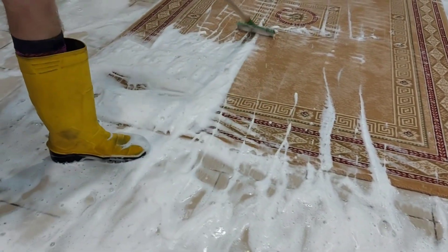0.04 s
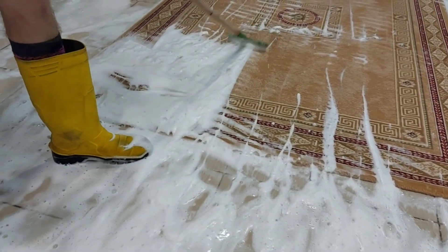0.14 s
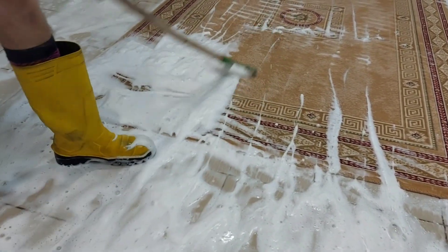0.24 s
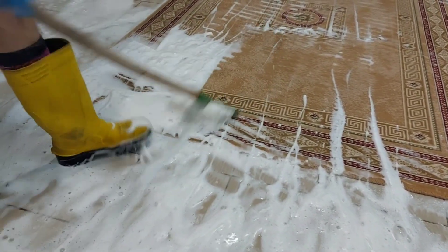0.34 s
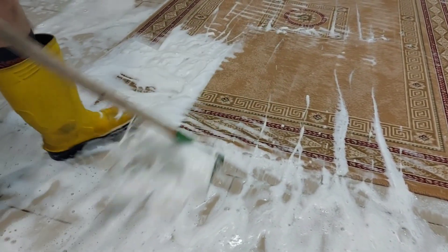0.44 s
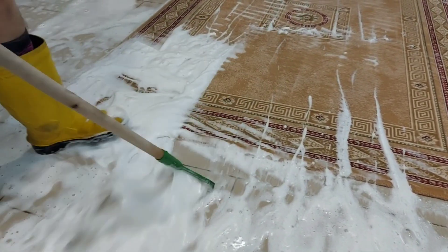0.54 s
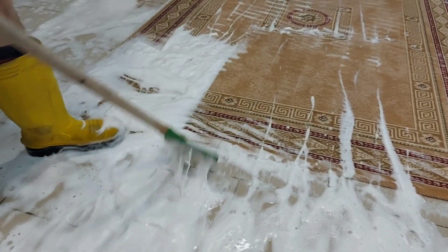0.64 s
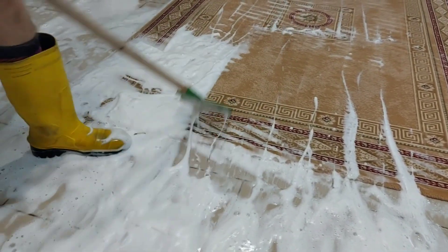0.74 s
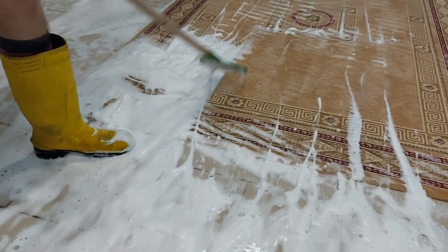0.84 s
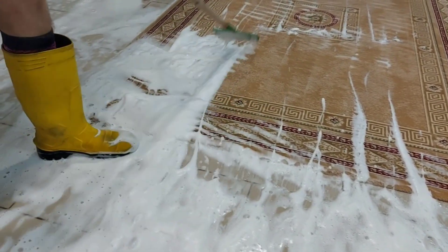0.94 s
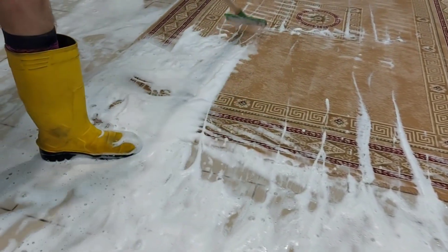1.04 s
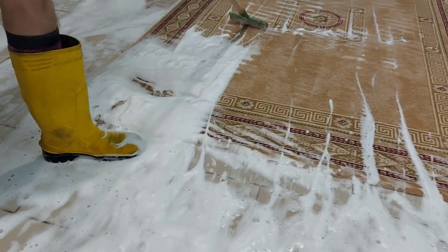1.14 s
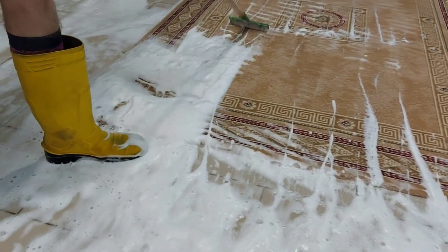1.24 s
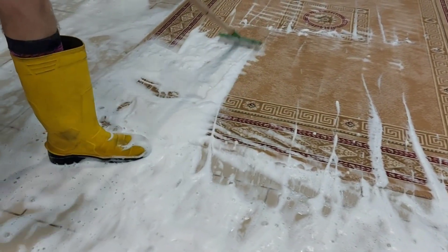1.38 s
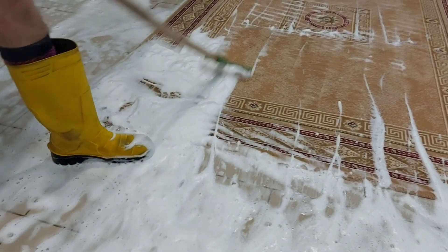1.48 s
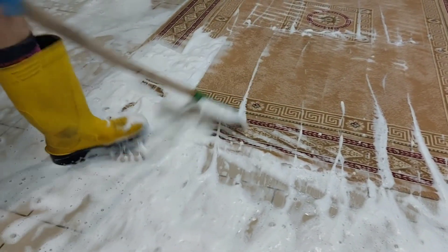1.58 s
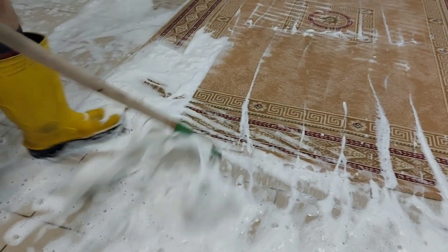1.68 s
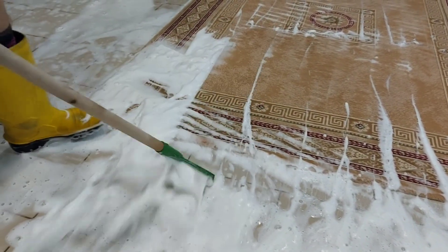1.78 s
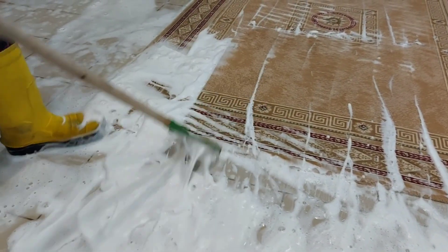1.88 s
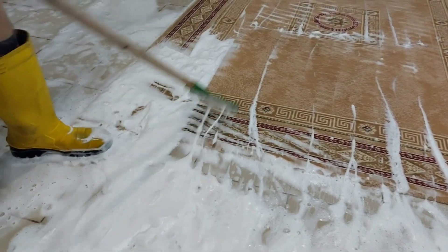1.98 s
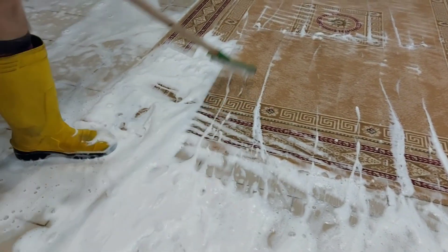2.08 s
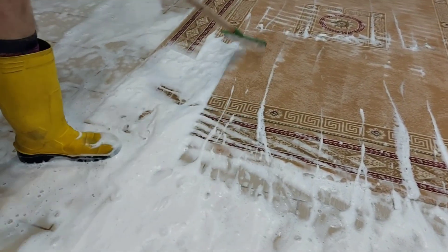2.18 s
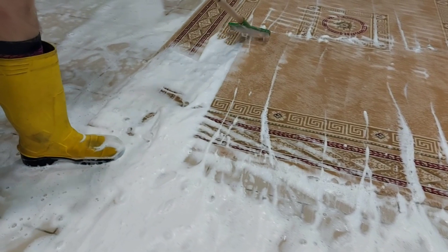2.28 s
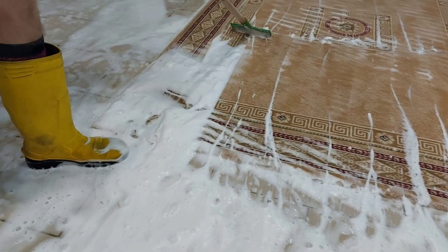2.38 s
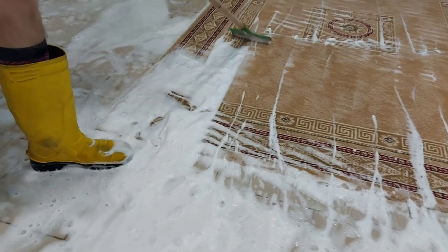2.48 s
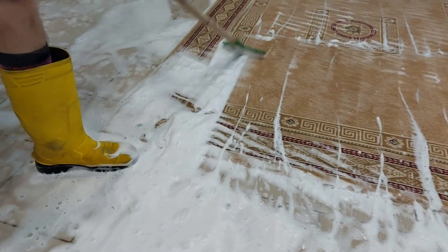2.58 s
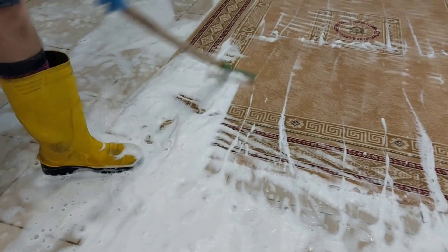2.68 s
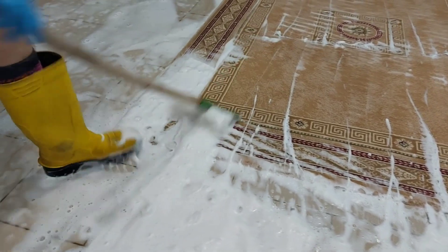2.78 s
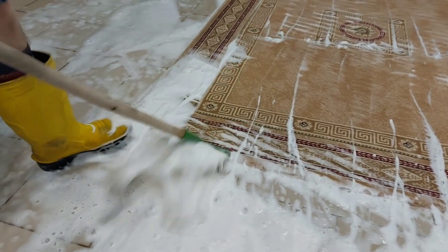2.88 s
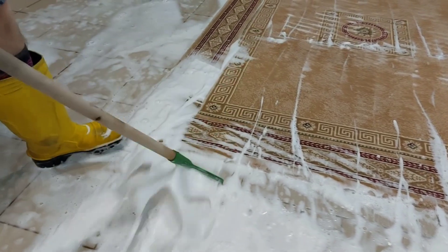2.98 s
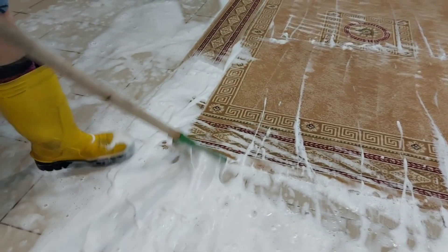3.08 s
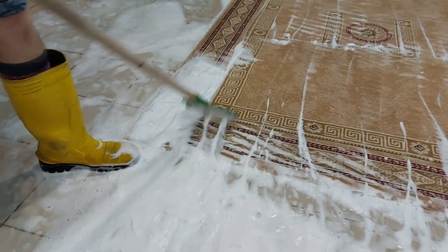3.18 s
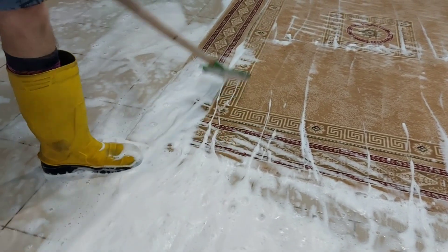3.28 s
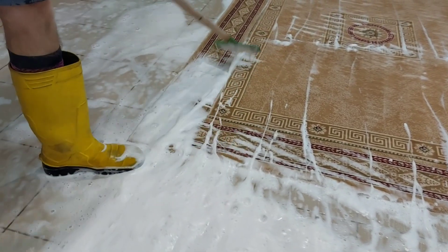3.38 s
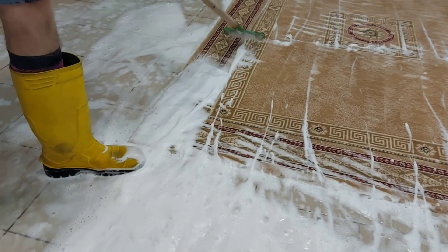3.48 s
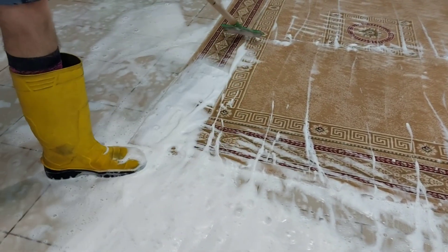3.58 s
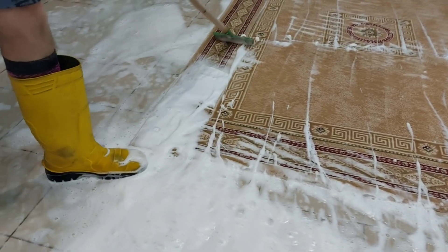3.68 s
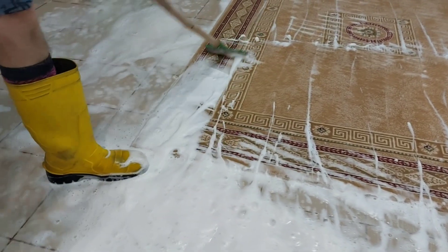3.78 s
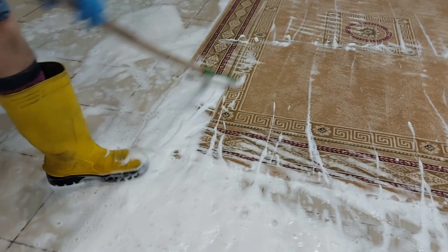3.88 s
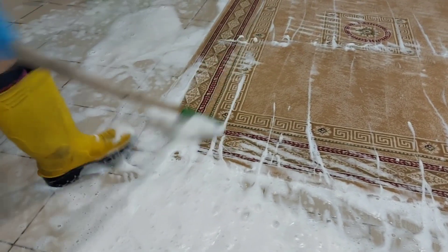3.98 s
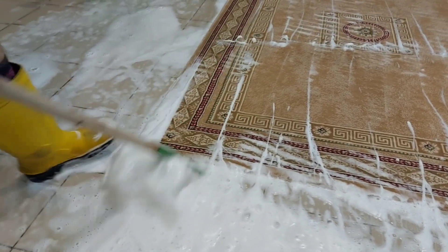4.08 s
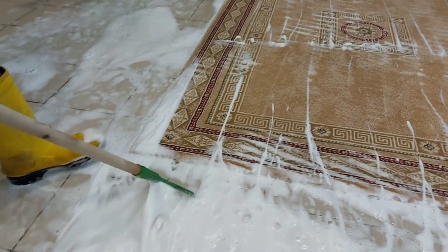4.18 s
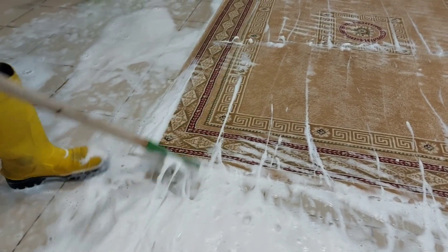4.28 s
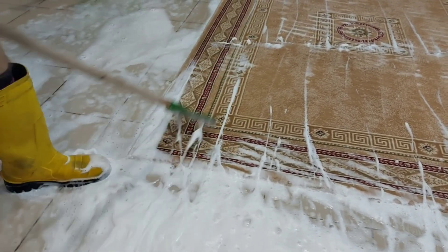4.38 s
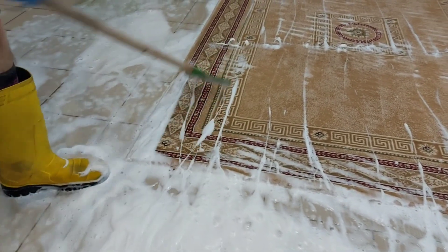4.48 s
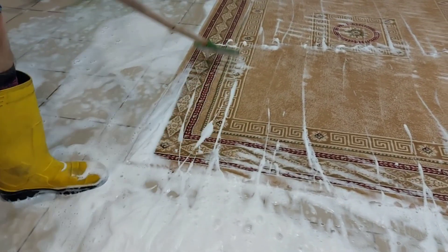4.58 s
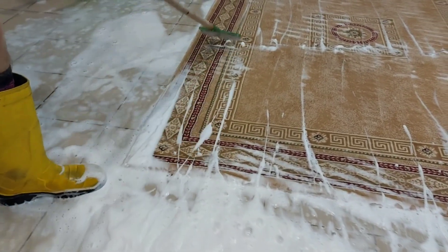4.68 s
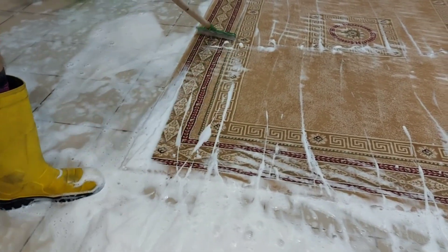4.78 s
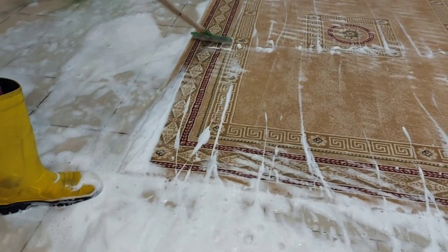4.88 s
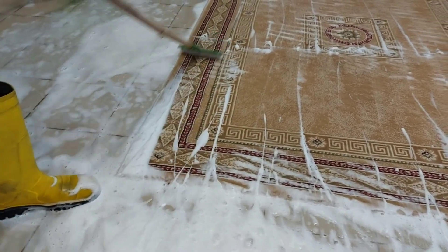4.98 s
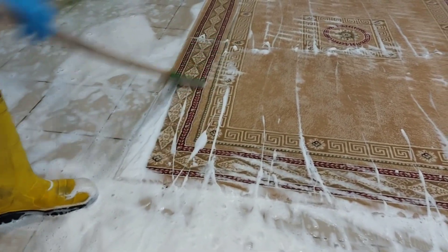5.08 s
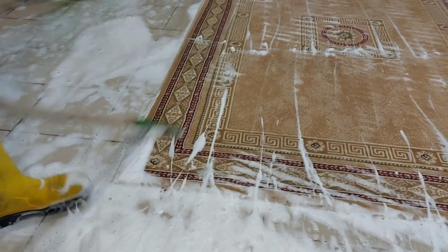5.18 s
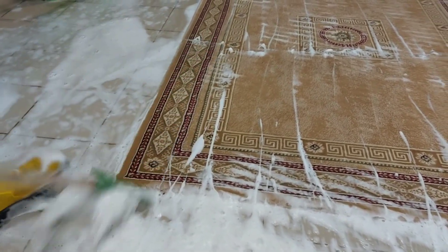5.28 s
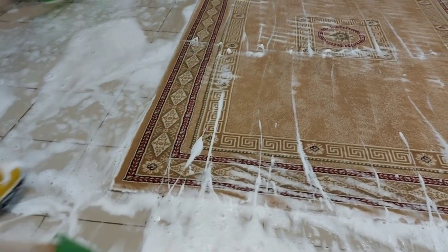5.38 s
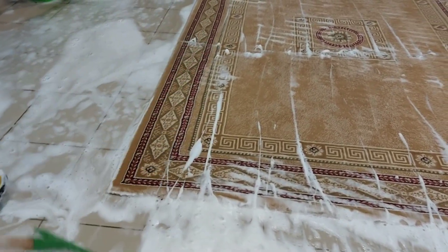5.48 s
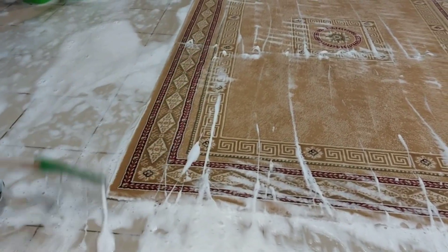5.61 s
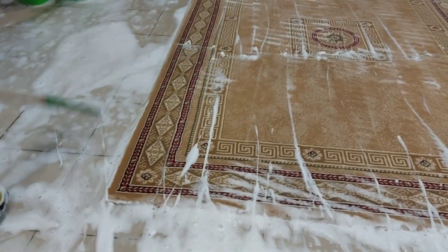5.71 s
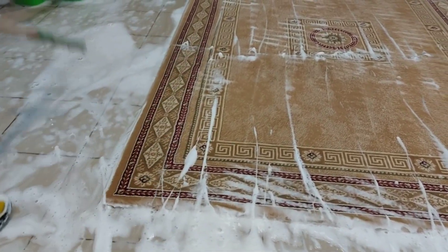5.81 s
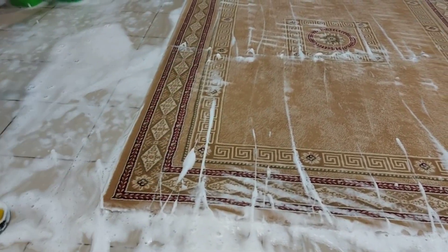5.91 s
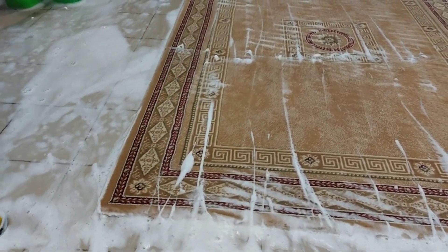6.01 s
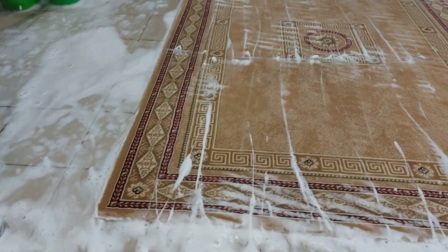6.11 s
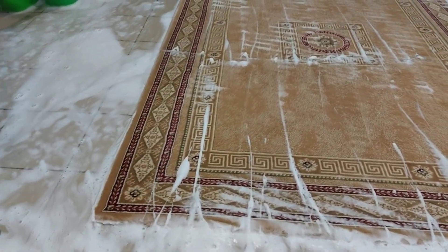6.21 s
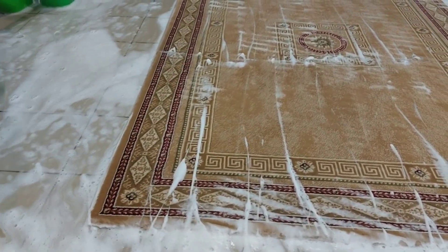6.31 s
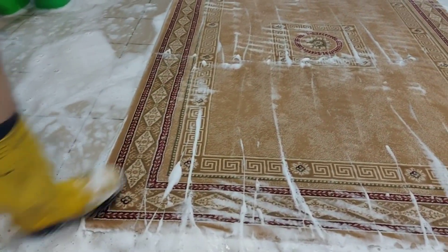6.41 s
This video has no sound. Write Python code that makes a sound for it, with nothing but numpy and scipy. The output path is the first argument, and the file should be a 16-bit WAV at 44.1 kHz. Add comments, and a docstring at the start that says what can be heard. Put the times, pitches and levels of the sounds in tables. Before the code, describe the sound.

In an echoing tiled room, rhythmic wet scrubbing swells and slaps off a carpet's edge, splashing gurgling suds over a low motor drone.

```python
"""A tiled, echoing workshop: a long-handled brush is dragged five times over a soapy wet carpet.
Each stroke swells into a wet hiss of crackling noise, with clouds of short rising bubble tones around it.
Then the head drops off the carpet's edge and slaps the flooded tiles: noise cracks, ringing plastic,
trapped air that plops, short pitched spits of noise, and thrown suds that patter and gurgle.
A machine hums in bands of noise, the foam fizzes in tiny bursts and drops tick on the floor."""
import sys
import numpy as np
from scipy import signal
from scipy.fft import rfft, irfft, next_fast_len
from scipy.io import wavfile
from scipy.ndimage import uniform_filter1d, map_coordinates

SR = 44100
rng = np.random.default_rng(int(sys.argv[2]) if len(sys.argv) > 2 else 0)


def waveform_to_disk(signal):
    """Save audio, clipped to [-1, 1], as 16-bit WAV at the path in sys.argv[1]."""
    frames = np.transpose(np.atleast_2d(signal))
    scaled = np.clip(frames, -1, 1) * 32767
    samples = np.round(scaled).astype(np.int16)
    wavfile.write(sys.argv[1], SR, samples)


N = 284445
TOP_HZ = 15950  # upper band limit


def amp(db):
    """Decibels to gain."""
    return 10 ** (np.asarray(db) / 20)


def unit(x):
    """Scaled to rms 1."""
    return x / np.sqrt(np.mean(x ** 2) + 1e-20)


def along(points, hz):
    """(frequency [Hz], value) points read on a log frequency axis."""
    f, v = np.transpose(points)
    return np.interp(np.log(hz + 1), np.log(f), v)


def clock():
    """The time of every sample in seconds."""
    return np.arange(N) / SR


def swell(s, width):
    """A bell-shaped rise and fall around time s; width is its standard deviation in seconds."""
    return np.exp(-.5 * ((clock() - s) / width) ** 2)


def wobble(rate):
    """A smooth random curve, rate knots a second."""
    knots = rng.standard_normal(int(N * rate / SR) + 4)
    return map_coordinates(knots, [clock() * rate])


def filtered(x, response):
    """x times a response of frequency, padded so that the end does not wrap onto the start."""
    m = next_fast_len(x.shape[-1] + 8192)
    spectrum = rfft(x, m) * response(np.fft.rfftfreq(m, 1 / SR))
    return irfft(spectrum, m)[..., :x.shape[-1]]


def coloured(x, spectrum, size=2048):
    """x through a causal (minimum-phase) filter of unit energy with this spectrum."""
    gain = amp(along(spectrum, np.fft.rfftfreq(size, 1 / SR)))
    cepstrum = irfft(np.log(gain))
    cepstrum[1:size // 2] *= 2
    cepstrum[size // 2 + 1:] = 0
    kernel = irfft(np.exp(rfft(cepstrum)))
    return signal.fftconvolve(x, kernel / np.linalg.norm(kernel))[:len(x)]


def cut(x, hz, kind):
    """A gentle causal low-pass or high-pass."""
    b, a = signal.butter(2, min(hz, .45 * SR), kind, fs=SR)
    return signal.lfilter(b, a, x)


def add(track, s, sound):
    """Mix a sound into a track at time s."""
    part = track[max(round(s * SR), 0):][:len(sound)]
    part += sound[:len(part)]


def crackle(rate, spread_db):
    """Tiny bursts of uneven size at random times, rate a second on average, rms 1."""
    bursts = rng.random(N) < rate / SR
    heights = rng.standard_normal(N)
    return unit(bursts * heights * amp(spread_db * np.clip(rng.standard_normal(N), -2, 2)))


def pocket(t, hz, t60, attack, rise):
    """Air trapped in water rings, its pitch rising as it nears the surface; it radiates no deep bass."""
    t = np.maximum(t, 0)
    phase = 2 * np.pi * hz * t * (1 + rise * np.minimum(t / t60, 1))
    envelope = amp(-60 * t / t60) * (1 - np.exp(-t / attack))
    return cut(np.sin(phase) * envelope, 0.44 * hz, "high")


def bubbling(rate, centre_hz, spread, cycles, size):
    """A cloud of short rising bubble tones of uneven strength around a steady or moving pitch, rms 1."""
    draws = rng.standard_normal((round(rate * N / SR), 2))
    pitch_draw, level_draw = np.clip(draws[:, :1], -2, 2), np.clip(draws[:, 1:], -2, 2)
    starts = rng.integers(0, N, (len(draws), 1))
    hz = np.broadcast_to(centre_hz, N)[starts] * np.exp(spread * pitch_draw)
    age = hz * np.arange(size) / SR  # in cycles
    envelope = amp(1.4 * level_draw - 60 * age / cycles) * (1 - np.exp(-2 * age))
    tones = envelope * np.sin(2 * np.pi * age * (1 + 0.2 * age / cycles))
    places = starts + np.arange(size)
    return unit(np.bincount(places.ravel(), tones.ravel(), N)[:N])


def snap(t60, rise, lead_in, size=60):
    """A short burst of noise with an evened-out spectrum; it starts after a quiet lead-in."""
    t = np.maximum(np.arange(SR // 5) / SR - lead_in, 0)
    shape = amp(-60 * t / t60) * (1 - np.exp(-t / rise))
    z = rfft(shape * rng.standard_normal(len(t)))
    smooth_power = np.abs(uniform_filter1d(np.abs(z) ** 2, size))
    return np.linalg.norm(shape) * irfft(z / np.sqrt(smooth_power), len(t))


def snaps(rows, colour, t60, rise, echo_db):
    """Rows of (s, dB, top Hz) as sharp snaps, scattered off the wet floor and into the room."""
    pair, echo_feed = np.zeros((2, N)), np.zeros(N)
    lead_in = .004  # s
    for s, db, top_hz in rows:
        for track in pair:
            burst = amp(db) * snap(t60, rise, lead_in)
            add(track, s - lead_in, cut(burst, top_hz, "low"))
        # the echo is fed a single impulse of the same energy, so its colour stays even
        impulse = np.linalg.norm(burst) * signal.unit_impulse(len(burst))
        add(echo_feed, s, cut(impulse, top_hz, "low"))
    straight = diffuse(np.array([coloured(track, colour) for track in pair]))
    return straight + amp(echo_db) * echo(coloured(echo_feed, colour))


# Likeness of left and right in sound from all sides: (frequency [Hz], correlation)
ALIKE = [(100, 0.99), (250, 0.95), (500, 0.68), (900, -0.04), (1500, -0.021), (4000, -0.0087)]


def diffuse(pair):
    """Two unrelated signals as sound from all sides: alike in the bass only."""
    turn = lambda hz: np.arccos(np.clip(along(ALIKE, hz), -1, 1)) / 2
    mid, side = filtered(pair, lambda hz: np.array([np.cos(turn(hz)), np.sin(turn(hz))]))
    return np.array([mid + side, mid - side])


def direct(x, left_lead=.0001):
    """Work a little to the left: its straight path reaches the left channel first, by left_lead seconds."""
    sides = np.array([[1], [-1]])
    return filtered(x, lambda hz: np.exp(1j * np.pi * hz * left_lead * sides))


# Decay of the hard-walled room: (frequency [Hz], time to fall 60 dB [s])
ROOM_T60 = [(100, 0.81), (500, 1.39), (1200, 1.14), (3500, 0.87), (7000, 0.66), (14000, 0.63)]


def echo(x, build_up=0.00061):
    """The tiled room answers from all sides with decaying noise, the treble dying first."""
    hz, t, z = signal.stft(rng.standard_normal((2, SR)), SR, nperseg=256)
    z = z * (1 - np.exp(-t / build_up)) * amp(-60 * t / along(ROOM_T60, hz)[:, None])
    tail = diffuse(signal.istft(z, SR, nperseg=256)[1])
    tail = tail / np.sqrt(np.sum(tail ** 2) / 2)
    return signal.fftconvolve(x[None], tail, axes=1)[:, :N]


def in_room(x, direct_db, echo_db):
    """A source heard both straight and off the walls."""
    return amp(direct_db) * direct(x) + amp(echo_db) * echo(x)


def scattered(make, direct_db, echo_db):
    """A wide spray of many small sources: left and right hear their own treble detail."""
    pair = np.array([make(), make()])
    return amp(direct_db) * diffuse(pair) + amp(echo_db) * echo(pair[0])


# Fuzzy bands of the drone: (centre [Hz], width [Hz], level before the slow level curve [dB])
HUM = [(73.5, 3.8, -56), (225.5, 22, -42), (250.9, 11.1, -40), (279, 23, -43), (341, 27, -50.5),
       (382.6, 32, -49), (485, 20, -47.5)]
# Slow level curve of the machine: (time [s], drone gain [dB], air gain [dB])
HUM_LEVEL = [(0, -2.5, -1.5), (1.35, -3.5, -1.5), (2.0, 1, 1.5), (3.6, 0.2, 0.4), (5.2, 0, 1.2),
             (6.4, -0.5, 0)]
# Colour of the machine's air: (frequency [Hz], relative level [dB])
AIR = [(20, -17), (36, -8), (90, 0), (180, 0), (350, -0.5), (600, -3), (1000, -8.5), (1800, -18),
       (2800, -20), (4000, -28.5), (7000, -40), (16000, -43)]


def machine(air_db=-42.0, waver_db=1.14, waver_share=0.01092):
    """A motor drones in fuzzy bands, each swelling on its own, all wavering in pitch, over the rush of its air."""
    times, *levels = np.transpose(HUM_LEVEL)
    drone_gain, air_gain = [amp(np.interp(clock(), times, db)) for db in levels]
    air_noise = rng.standard_normal((2, N))
    air = amp(air_db) * unit(filtered(air_noise, lambda f: amp(along(AIR, f))))
    drone = np.zeros((2, N))
    for hz, width, db in HUM:
        noise = rng.standard_normal((2, N))
        band = filtered(noise, lambda f: (1 + (2 * (f - hz) / width) ** 4) ** -.5)
        drone += amp(db) * unit(band * amp(waver_db * wobble(4)))
    # reading the drone at an uneven speed bends its pitch
    turned = np.cumsum(1 + waver_share * wobble(3))
    drone = np.array([map_coordinates(side, [turned], order=1, mode="mirror") for side in drone])
    return diffuse(air * air_gain + drone * drone_gain)


# Head set back into the foam between pulls: (time [s], level [dB], bell width [s])
LANDINGS = [(1.06, -66, 0.06), (2.295, -65.5, 0.068), (3.503, -67, 0.066), (4.74, -71, 0.038)]
# Colour of the bursting foam: (frequency [Hz], relative level [dB])
FIZZ = [(2000, 10), (5000, -28), (7500, -11), (10500, -0.5), (13000, -2.5), (16000, -26)]
# Colour of crinkling foam and ticking drops: (frequency [Hz], relative level [dB])
TICK = [(1000, -37), (3000, -4), (5000, -4), (8000, -8), (11000, -3.5), (16000, -11.5)]


def foam(full_db=-61.5, grows_db=9, grows_s=0.8):
    """Countless small bubbles burst all over the floor, more as foam is worked up and where the head lands."""
    fizz = np.array([coloured(crackle(rate=5600, spread_db=-3.5), FIZZ) for _ in range(2)])
    crushed = sum(amp(db) * swell(s, width) for s, db, width in LANDINGS)
    crinkle = np.array([coloured(crackle(rate=2300, spread_db=-1.0), TICK) for _ in range(2)])
    growth = amp(full_db - grows_db * np.exp(-clock() / grows_s))
    return fizz * growth + crushed * crinkle


def pull_db(start, fastest, end, swell_db, ease, stop_db_per_s=346):
    """Level of one pull: it swells, eases off at so many dB per second, and dies quickly outside the stroke."""
    t = clock()
    outside = np.maximum(t - end, 0) + np.maximum(start - t, 0)
    swelling = swell_db * (t - fastest) / (fastest - start)
    easing = -ease * (t - fastest)
    return np.minimum(swelling, easing) - stop_db_per_s * outside


# One pull of the brush per row, dying quickly after its end; levels come before the mix gains:
# (start [s], fastest [s], end of the pull [s], easing off [dB/s], wash of pushed water [dB],
#  hiss of the pile [dB], wave of suds fullest [s], its bubbling [dB], its bubble pitch [Hz], its froth [dB])
STROKES = [(0.015, 0.334, 0.57, 42, -30, -37.5, 0.38, -49, 960, -48),
           (1.257, 1.598, 1.63, 70, -30.5, -39, 1.6, -35.5, 560, -39),
           (2.44, 2.805, 2.874, 63, -32, -36, 2.86, -30, 467, -39.5),
           (3.632, 3.996, 4.125, 67, -33, -37, 4.04, -29.5, 558, -35),
           (4.847, 5.197, 5.27, 21, -34.5, -37, 5.29, -36.5, 720, -40)]
# Colour of the pushed water: (frequency [Hz], relative level [dB])
WASH = [(80, -77), (200, 7.5), (350, 9), (550, -0.5), (800, -3.5), (1200, -10), (1900, -10.5),
        (4000, -34.5)]
# Colour of the carpet pile: (frequency [Hz], relative level [dB])
HISS = [(150, -84), (500, -35), (1300, 1), (2200, -2.5), (3300, -5), (5000, -9), (8000, -15),
        (10500, -10.5), (13000, -15), (16000, -21.5)]


def scrubbing(grip_db=2.37, surge_db=2, rasp_db=-3, squelch_db=-7, bristles_db=-7.0):
    """The bristles flick water out of the pile and squelch small bubbles in the water they push."""
    swell_db, wash_lag = 20.5, 0.031  # the pushed water trails the head by wash_lag seconds
    push, drag = np.zeros((2, N))
    for start, fastest, end, ease, wash_db, hiss_db, *_ in STROKES:
        push += amp(wash_db + pull_db(start, fastest + wash_lag, end, swell_db, ease))
        drag += amp(hiss_db + pull_db(start, fastest, end, swell_db, ease))
    grip = grip_db * wobble(70)  # the head catches and slides
    surge = surge_db * wobble(60)  # the water folds over in lumps
    rasp = coloured(crackle(rate=1200, spread_db=2.0), WASH)
    squelch = bubbling(rate=300, centre_hz=982, spread=0.38, cycles=6.6, size=800)
    wash = push * amp(grip + surge) * (amp(rasp_db) * rasp + amp(squelch_db) * squelch)
    flick = drag * amp(grip)
    hiss = lambda: flick * coloured(crackle(rate=2200, spread_db=0.0), HISS)
    # single stiff bristles spring free
    springing = bubbling(rate=220, centre_hz=1690, spread=0.47, cycles=4.2, size=400)
    bristles = flick * amp(bristles_db) * springing
    near = in_room(wash + bristles, direct_db=-3.0, echo_db=-4.5)
    return near + scattered(hiss, direct_db=-8.0, echo_db=-3.5)


def wave(swell_db=28, ease=70, froth_hz=1000, froth_lead=0.033, sink_octaves_per_s=1.6):
    """The wave of suds ahead of the head bubbles louder and lower as it grows; a finer froth runs before it."""
    level, froth, times, pitches = np.zeros(N), np.zeros(N), [], []
    for start, _, end, *_, fullest, db, hz, froth_db in STROKES:
        level += amp(db + pull_db(start, fullest, end, swell_db, ease))
        froth += amp(froth_db + pull_db(start, fullest - froth_lead, end, swell_db, ease))
        times += [start, end]
        pitches += [np.log2(hz) - sink_octaves_per_s * (s - fullest) for s in (start, end)]
    sinking_hz = 2 ** np.interp(clock(), times, pitches)
    bubbles = bubbling(rate=450, centre_hz=sinking_hz, spread=0.21, cycles=11.6, size=1600)
    fine = bubbling(rate=600, centre_hz=froth_hz, spread=0.18, cycles=11, size=800)
    return in_room(level * bubbles + froth * fine, direct_db=-3.5, echo_db=-4.5)


# The nearest drops: (time [s], relative level [dB])
DRIPS = [(0.22, -26), (0.9951, -41), (1.644, -28), (1.8403, -32), (1.9094, -35), (1.983, -36),
         (2.1494, -46), (3.1722, -36.5), (4.349, -32.5), (4.626, -26.5), (5.6978, -36), (5.769, -41),
         (6.2855, -31), (6.3594, -32), (6.408, -30.5)]


def drips(tick_gain_db=-3):
    """Single drops tick sharply on the wet floor as tiny bursts of noise."""
    ticks = [(s, db + tick_gain_db, TOP_HZ) for s, db in DRIPS]
    return snaps(ticks, TICK, t60=0.0083, rise=0.00037, echo_db=-2.0)


# The head judders on the carpet: (time [s], level before the mix gains [dB], bell width [s])
JUDDERS = [(0.43, -32, 0.033), (1.652, -34.5, 0.042), (2.898, -38, 0.036)]


def judder(low_hz=49, high_hz=76):
    """Pressed hard, the head shakes the carpet with a low rumble."""
    noise = rng.standard_normal(N)
    shake = filtered(noise, lambda f: (f > low_hz) / (1 + (f / high_hz) ** 4))
    phase = np.angle(signal.hilbert(shake))
    rumble = unit(np.cos(phase))  # uneven in rate, even in strength
    pressure = sum(amp(db) * swell(s, width) for s, db, width in JUDDERS)
    return in_room(rumble * pressure, direct_db=-3.0, echo_db=-8.0)


# Large bubbles under the head and in the thrown suds: (time [s], level before the mix gains [dB], pitch [Hz])
GULPS = [(0.4318, -20.5, 410), (0.535, -14.5, 610), (0.5494, -8.5, 481), (0.558, -16.5, 468),
         (0.575, -16, 510), (0.592, -14, 587), (0.657, -22.5, 522), (0.698, -22, 478), (0.741, -24, 598.7),
         (0.942, -36, 704), (1.568, -25, 510), (1.59, -20, 905), (1.622, -26, 480), (1.7307, -19.5, 335),
         (1.7524, -17, 306.4), (2.382, -41, 745), (2.918, -23, 444), (3.044, -24, 994), (3.062, -32, 580),
         (3.9745, -19.5, 637), (4.077, -20, 495), (4.149, -16, 925), (4.1974, -18.5, 417),
         (4.237, -19.5, 425), (5.383, -23, 480), (5.402, -19, 795), (5.432, -20.5, 499)]


def gulps(cycles=25.4):
    """Large round bubbles ring, each at its own pitch, falling 60 dB over so many cycles."""
    t, track = np.arange(SR // 5) / SR, np.zeros(N)
    for s, db, hz in GULPS:
        add(track, s, amp(db) * pocket(t, hz, cycles / hz, attack=0.0019, rise=0.051))
    return in_room(track, direct_db=3.5, echo_db=-4.0)


# The head slaps the wet floor, one edge after the other, and traps air; levels come before the mix gains:
# (time [s], crack [dB], crack's upper limit [Hz], ring of the head [dB], air pocket [dB], pocket pitch [Hz],
#  pocket's fall by 60 dB [cycles])
SLAPS = [(0.4765, -26, 6950, -36, 0.5, 513, 6.3), (0.4934, -23, 13100, -29, 3, 517, 5.2),
         (1.7233, -27.5, 3600, -31, -6.5, 860, 3.9), (1.7484, -35, 6500, -40, -14, 307, 4.2),
         (1.762, -39, 2800, -42, -23, 560, 5.1), (2.9523, -37.5, 14000, -49, -33, 890, 4.1),
         (2.9700, -28, 6000, -14.5, 4, 473, 3.66), (2.982, -42, 4000, -29, -6, 426, 8.1),
         (4.125, -31, 13000, -38, -8, 470, 5.8), (4.1446, -36, 8000, -31, -3.5, 440, 7.6),
         (4.168, -40, 5000, -53, -12, 430, 6.8), (5.3281, -24, 10700, -17.5, 8, 770, 2.06),
         (5.3416, -23.5, 8900, -38, 5, 445, 2.23), (5.3490, -28.5, 9000, -31, -1, 597, 2.3)]
# Modes of the plastic head, damped by the wet bristles:
# (frequency [Hz], mean relative level [dB], time to fall 60 dB [s])
HEAD = [(1312, -0.5, 0.026), (2530, -12.5, 0.021), (3240, -4.5, 0.015), (4030, -5, 0.014),
        (4150, -7, 0.014), (5800, -25, 0.008)]
# Colour of the cracking water film: (frequency [Hz], relative level [dB])
CRACK = [(50, -41), (150, -27), (600, -1), (1300, 5.5), (2000, 0), (3500, -3), (6000, -6.5), (8000, -12.5),
         (11000, -8.5), (16000, -48)]


def slaps(closing=0.00169, crack_gain_db=10.5, ring_spread_db=0.5):
    """The water film cracks; closing seconds later the head rings and the trapped air gives a hollow plop."""
    t, plops, rings = np.arange(SR // 5) / SR, np.zeros(N), np.zeros(N)
    for s, _, _, ring_db, pocket_db, hz, cycles in SLAPS:
        plop = pocket(t - closing, hz, cycles / hz, attack=0.00057, rise=0.04)
        add(plops, s, amp(pocket_db) * plop)
        ring = np.zeros(len(t))
        for f, db, t60 in HEAD:
            uneven_db = db + ring_spread_db * rng.standard_normal()
            ring += amp(uneven_db - 60 * t / t60) * np.sin(2 * np.pi * f * t)
        add(rings, s + closing, amp(ring_db) * ring)
    cracks = snaps([row[:3] for row in SLAPS], CRACK, t60=0.026, rise=0.00019, echo_db=-7.5)
    hollow = in_room(plops, direct_db=3.0, echo_db=-4.5)
    return amp(crack_gain_db) * cracks + hollow + in_room(rings, direct_db=5.0, echo_db=-9.0)


# Water jets from under the closing head: (time when it shuts [s], level before the mix gains [dB])
SQUIRTS = [(0.493, -23), (1.75, -27), (4.146, -21.5), (5.343, -16.5)]
# Colour of squirted and thrown water: (frequency [Hz], relative level [dB])
SPRAY = [(100, -54), (300, -0.5), (800, 20.5), (1100, 21.5), (1450, -2.5), (2000, -1.5), (3900, 6.5),
         (5400, -3), (8000, -7.5), (11000, -3.5), (16000, -17)]


def squirts(rise_db_per_s=1100):
    """The last of the water jets out from under the head, louder and louder until it shuts."""
    jet = np.zeros(N)
    for s, db in SQUIRTS:
        jet += amp(db - rise_db_per_s * np.abs(s - clock())) * (clock() < s)
    spray = lambda: jet * coloured(crackle(rate=5400, spread_db=0.5), SPRAY)
    return scattered(spray, direct_db=-1.0, echo_db=-8)


# Short bursts of narrow-band noise around the slaps:
# (time [s], level before the mix gains [dB], centre [Hz], time to fall 60 dB [s])
SPITS = [(0.494, -29, 3770, 0.04), (0.533, -27, 2140, 0.028), (0.556, -29, 2900, 0.022),
         (1.723, -22, 1000, 0.02), (1.7228, -28, 4050, 0.015), (1.748, -30, 2950, 0.02),
         (1.763, -33, 2440, 0.025), (1.78, -34, 2300, 0.02), (2.9515, -34, 5900, 0.014),
         (2.971, -25, 3330, 0.045), (2.99, -39, 4250, 0.1), (4.1233, -31, 6100, 0.026),
         (4.128, -34, 4750, 0.03), (4.139, -26, 947, 0.025), (4.144, -27, 3230, 0.022),
         (4.167, -28.5, 2380, 0.025), (5.328, -19.5, 1304, 0.02), (5.339, -27, 5700, 0.02),
         (5.341, -22, 834, 0.03), (5.341, -28.5, 3250, 0.08), (5.352, -30, 2220, 0.07),
         (5.369, -26, 2790, 0.044), (5.37, -33, 4650, 0.06)]


def spits(width=0.091, rise=0.001):
    """Each burst is noise in a narrow band around its centre, quickly dying: a short, pitched spit."""
    track = np.zeros(N)
    for s, db, hz, t60 in SPITS:
        burst = snap(t60, rise, lead_in=0)
        limits = hz * np.exp(width * np.array([-.5, .5]))
        b, a = signal.butter(2, limits, "band", fs=SR)
        spit = signal.lfilter(b, a, burst)
        same_energy = np.linalg.norm(burst) / np.linalg.norm(spit)
        add(track, s, amp(db) * spit * same_energy)
    return in_room(track, direct_db=1.0, echo_db=-5.0)


# Thrown suds land; levels come before the mix gains:
# (time [s], spray [dB], droplet pitch [Hz], gurgle [dB], gurgle pitch [Hz])
SPLASHES = [(0.52, -30, 3800, -23.5, 523), (1.772, -39.5, 2400, -34, 420), (3.005, -39, 3740, -29.5, 431),
            (4.162, -38.5, 3270, -30, 435), (5.364, -29.5, 3070, -22, 700)]


def splashes(count=40, pitch_spread=0.227, cycles=14, droplets_db=-5.0, patter_db=0.0, width=0.032):
    """Thrown suds patter on the tiles, tinkle as droplets and fold air into gurgling bubbles."""
    t, throw, gurgle = np.arange(SR // 10) / SR, np.zeros(N), np.zeros(N)
    for s, spray_db, _, gurgle_db, hz in SPLASHES:
        throw += amp(spray_db) * swell(s, width)
        for when, pitch, bulk in rng.standard_normal((count, 3)):
            bubble_hz = hz * np.exp(pitch_spread * pitch)
            bubble = pocket(t, bubble_hz, cycles / bubble_hz, attack=0.0002, rise=0.15)
            bubble_s = s + width * (1.3 * abs(when) - .7)
            add(gurgle, bubble_s, amp(gurgle_db + 2 * bulk) * bubble)
    patter = lambda: throw * amp(patter_db) * coloured(crackle(rate=2000, spread_db=6.5), SPRAY)
    times, _, droplet_hz, *_ = np.transpose(SPLASHES)
    moving_hz = np.interp(clock(), times, droplet_hz)
    tinkle = bubbling(rate=420, centre_hz=moving_hz, spread=0.361, cycles=26, size=600)
    droplets = throw * amp(droplets_db) * tinkle
    spray = scattered(patter, direct_db=-0.5, echo_db=0.0)
    spray = spray + in_room(droplets, direct_db=-1.0, echo_db=-5.0)
    return spray + in_room(gurgle, direct_db=-3.5, echo_db=-6.5)


def scene(left_db=0.67):
    """All sources, a little stronger on the left."""
    room = machine() + foam()
    strokes = scrubbing() + wave() + drips() + judder() + gulps()
    impacts = slaps() + squirts() + spits() + splashes()
    return (room + strokes + impacts) * amp([[left_db], [-left_db]])


def record(dry):
    """Peaks near full scale are rounded off; the deepest bass and all above the band limit are dropped."""
    limited = dry / (1 + np.abs(dry) ** 8) ** (1 / 8)
    return filtered(limited, lambda hz: (hz < TOP_HZ) * (1 - 1 / (1 + (hz / 35) ** 10)))


dry = scene()
out = record(dry)
waveform_to_disk(out)
```